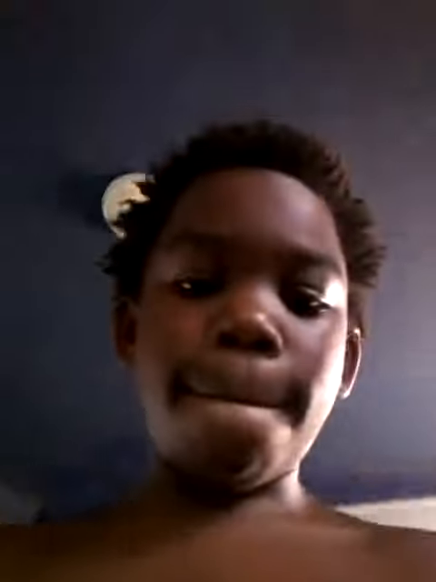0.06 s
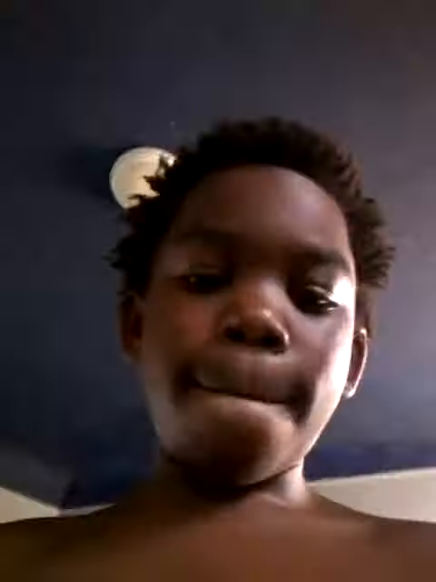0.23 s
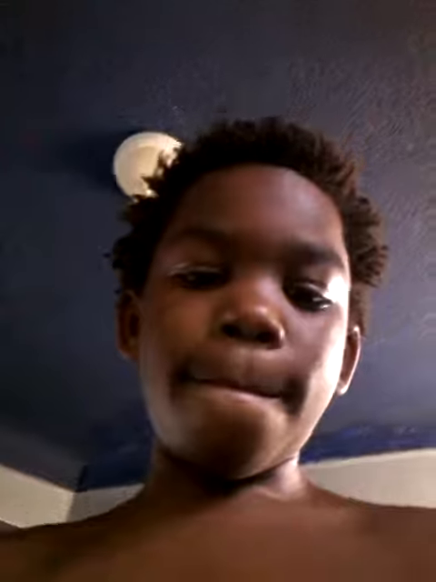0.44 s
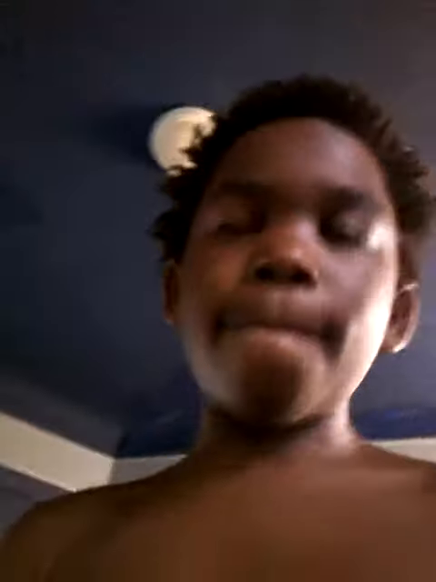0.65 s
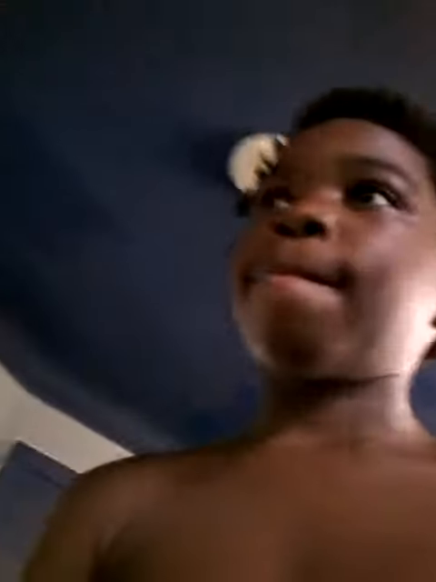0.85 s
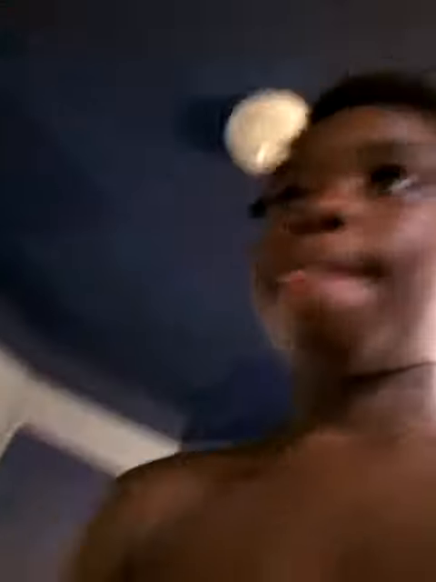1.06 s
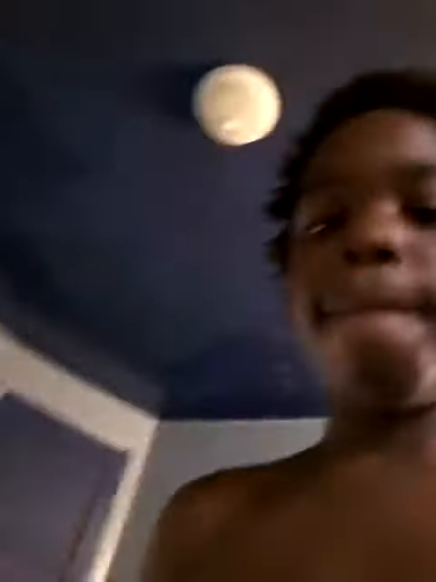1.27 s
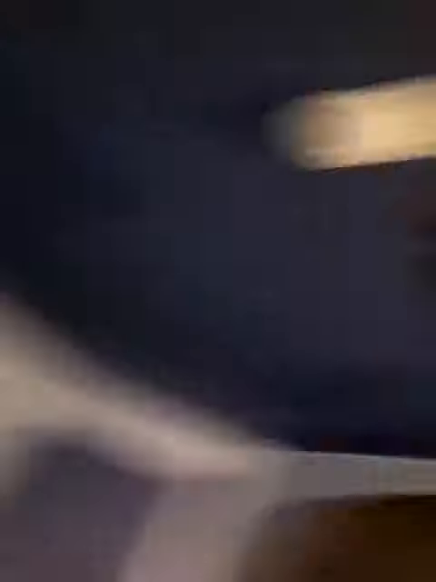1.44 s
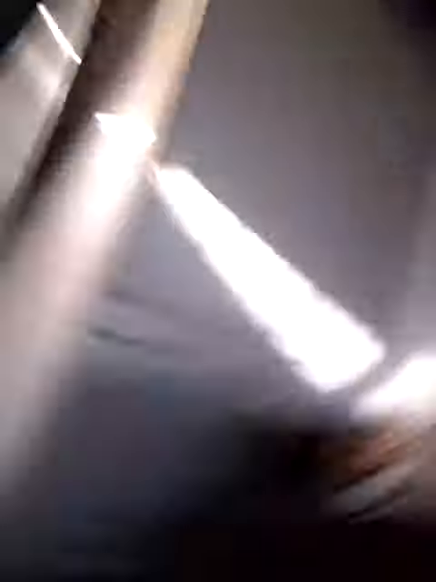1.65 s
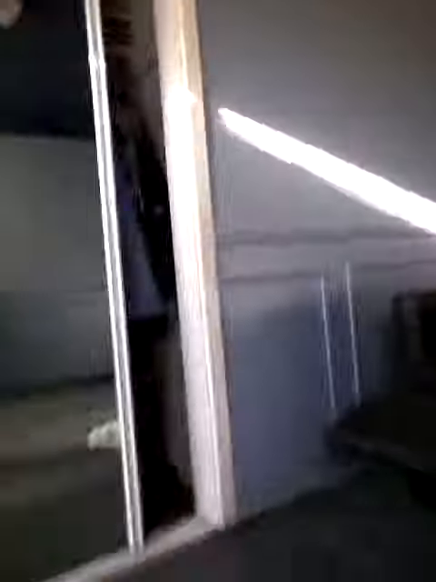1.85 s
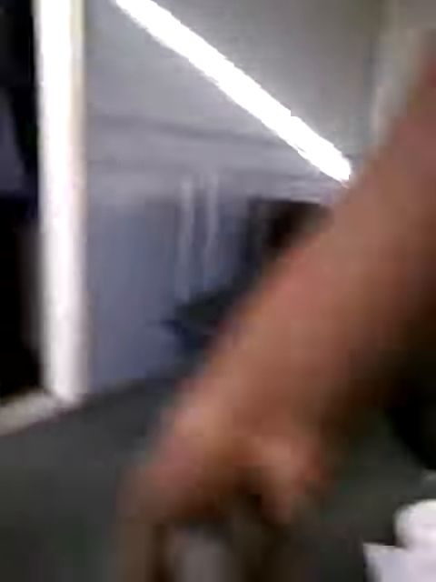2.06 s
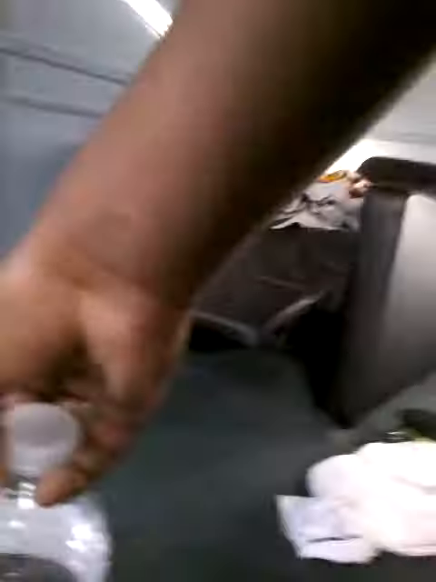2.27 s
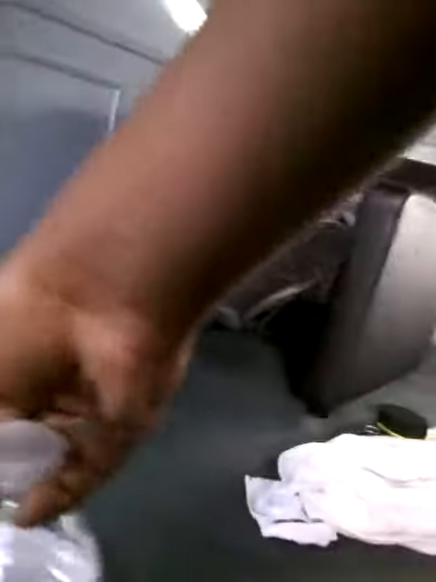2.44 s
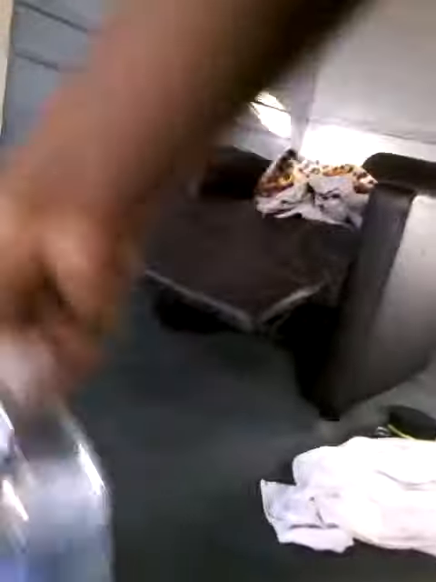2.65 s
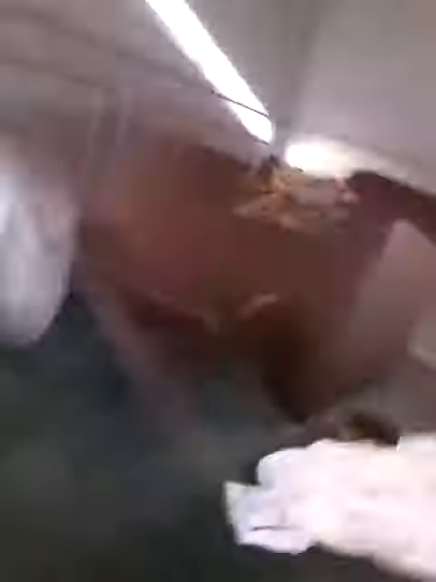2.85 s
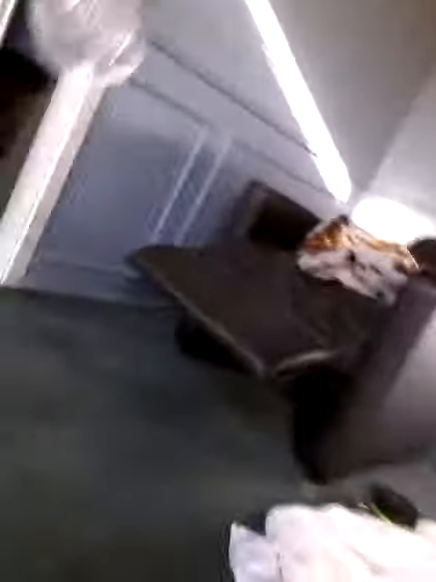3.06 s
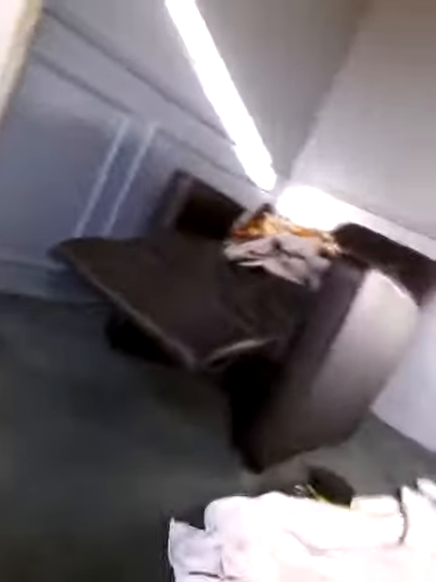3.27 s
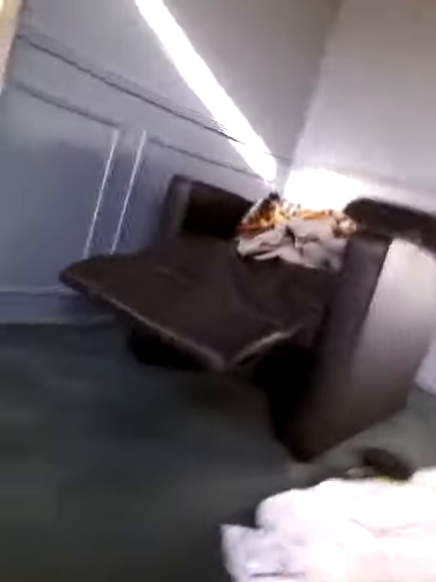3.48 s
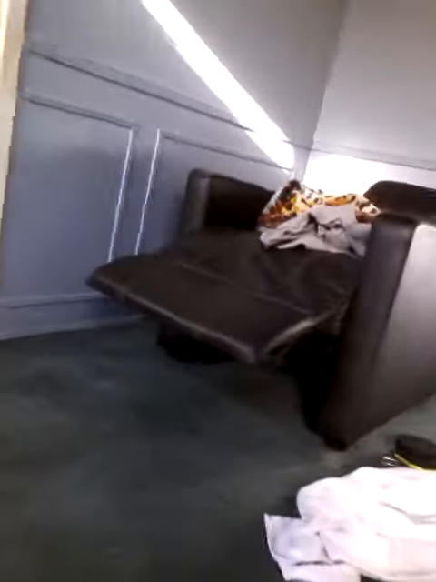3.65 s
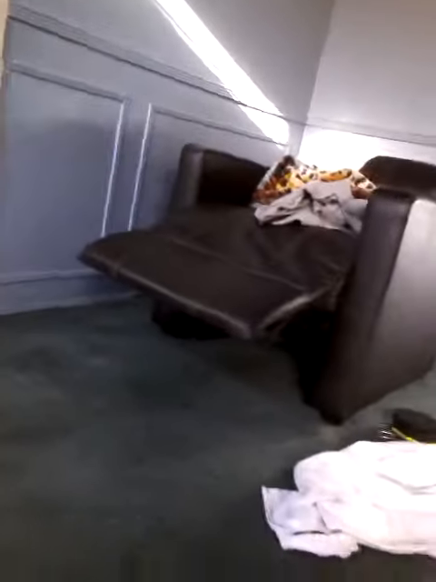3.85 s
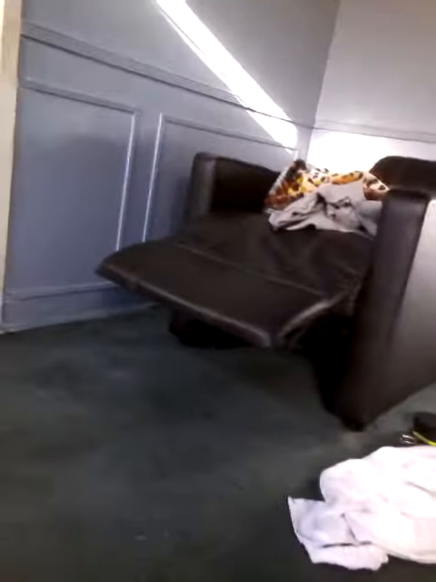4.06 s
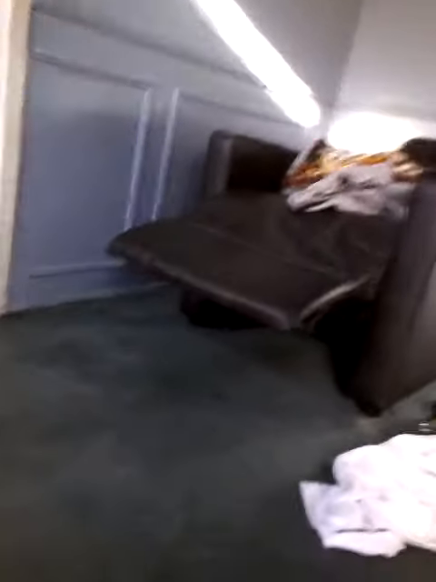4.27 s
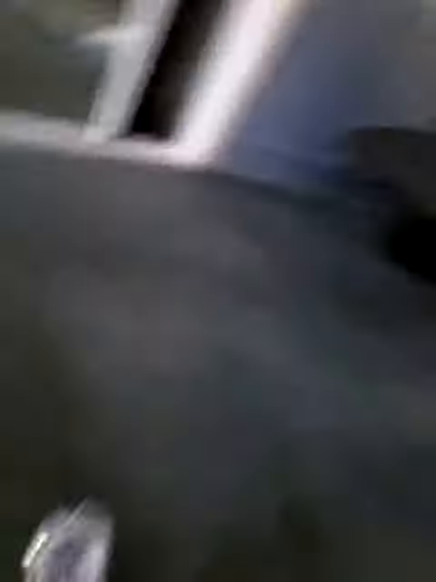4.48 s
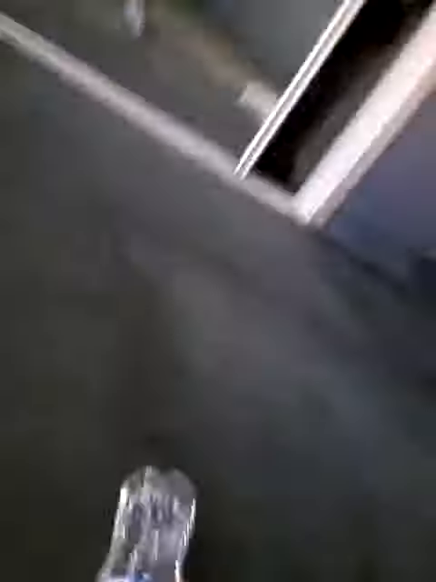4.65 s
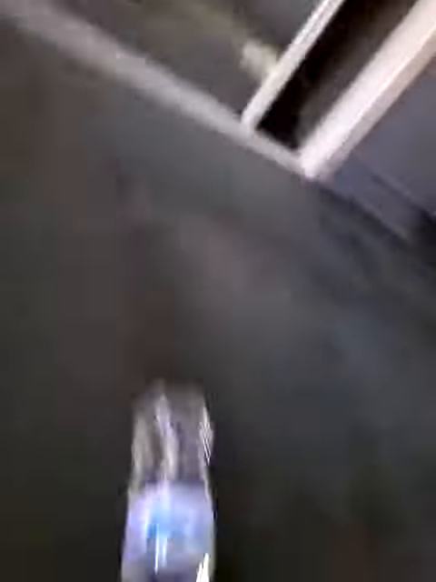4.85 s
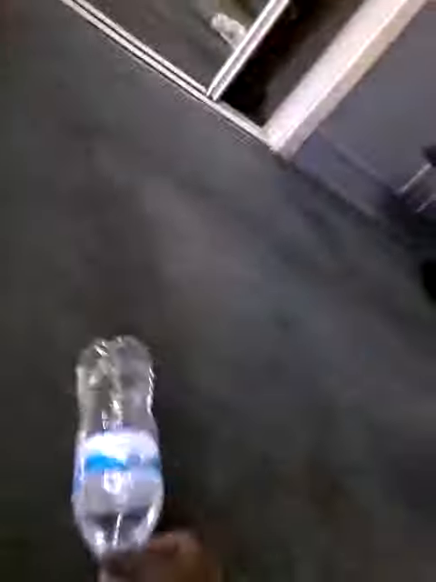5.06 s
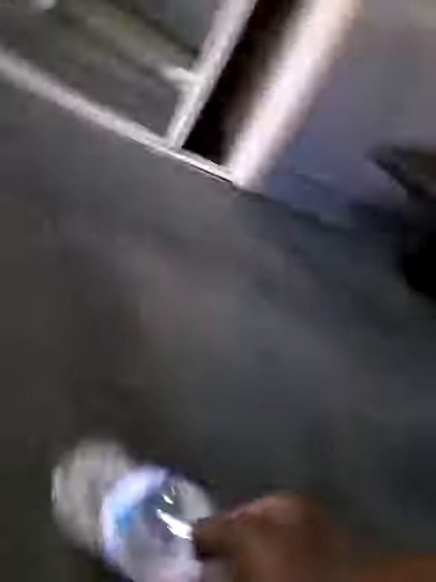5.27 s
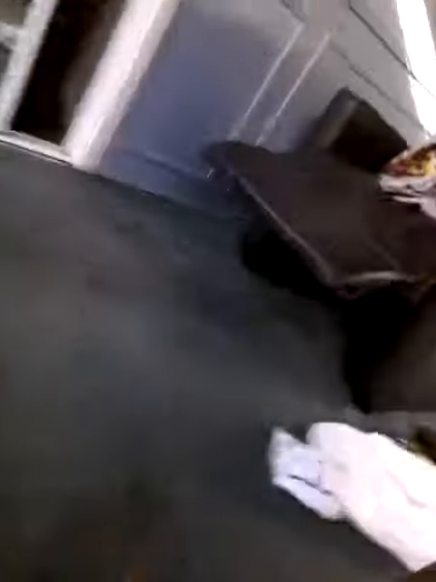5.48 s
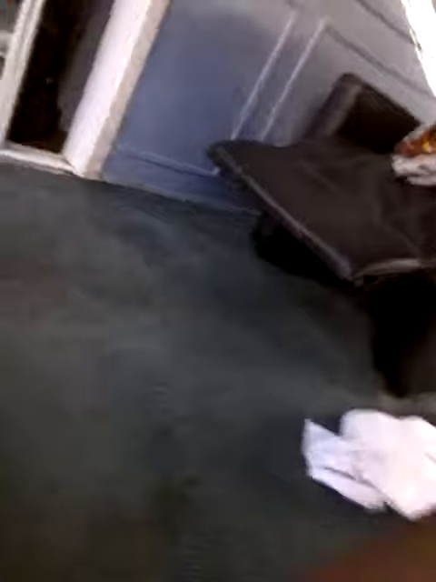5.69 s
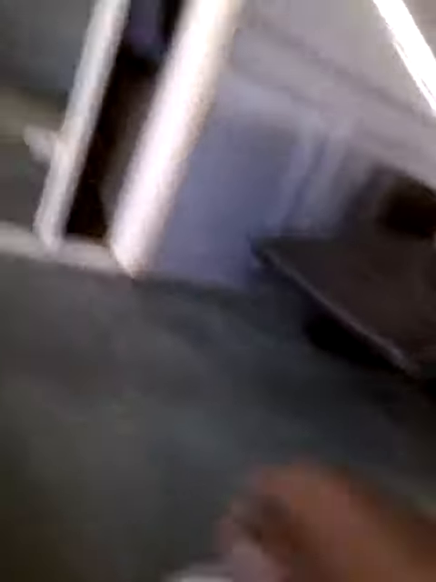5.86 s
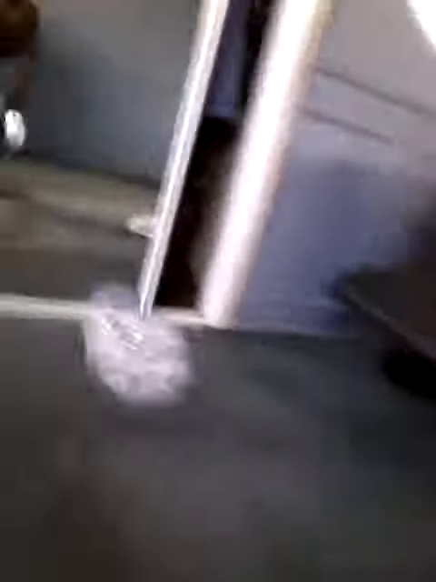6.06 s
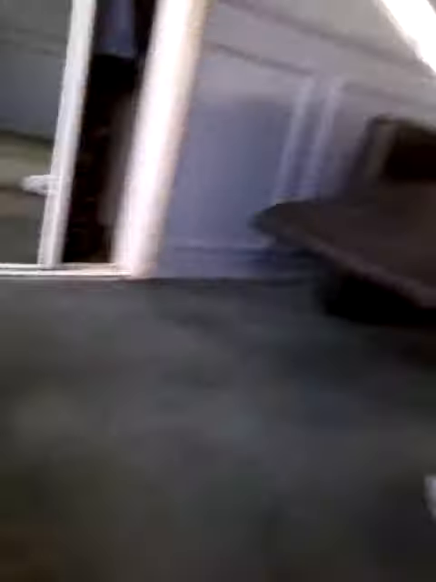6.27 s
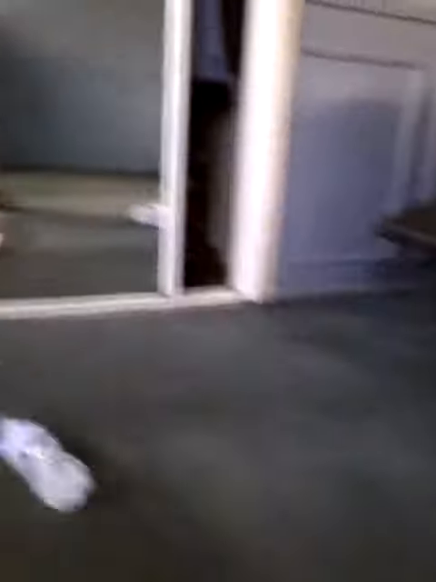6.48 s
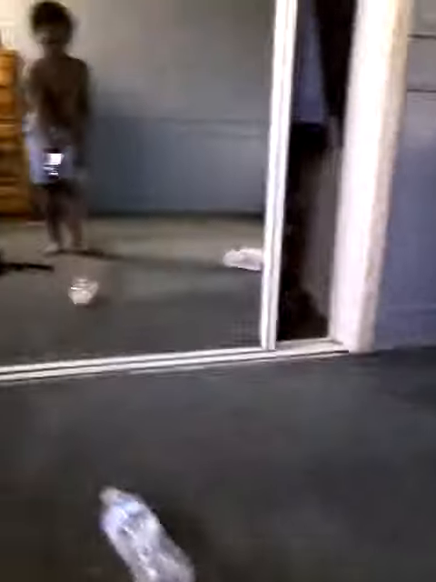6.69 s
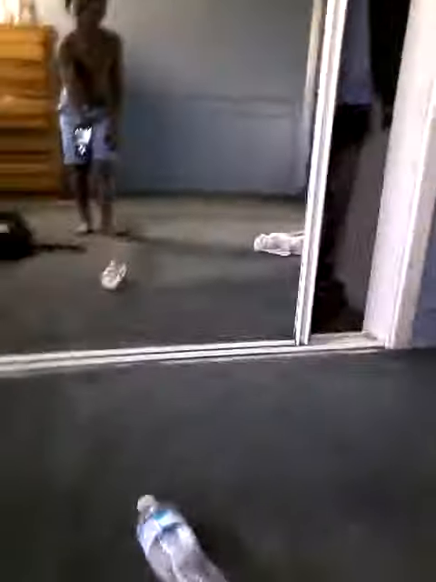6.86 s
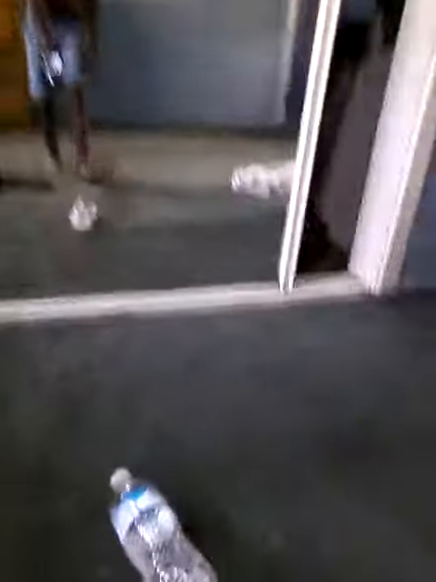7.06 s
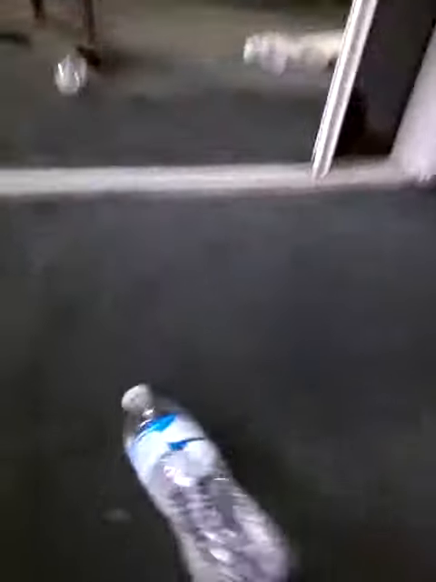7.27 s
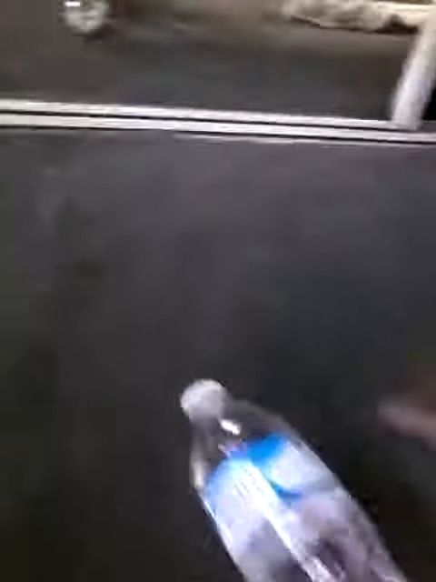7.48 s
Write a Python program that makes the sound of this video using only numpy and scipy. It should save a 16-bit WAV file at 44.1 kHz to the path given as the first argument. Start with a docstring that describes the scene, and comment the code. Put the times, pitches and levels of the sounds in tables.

```python
"""A part-filled thin plastic water bottle lands twice on a carpeted bedroom floor, handled before, between and after.
Each landing sums decaying thuds, wall knocks and floor modes with grainy noise that drives the shell's modes.
The shell snaps and pops in the hand: resonated noise cracks, hollow decaying tones, then tiny creaking ticks.
Band-passed grains scuff, coloured noise rustles as cloth, low decaying tones are footfalls and bumps, a hard
click rings, and the room holds a wavering hum, low rumble and steady air."""
import sys
import numpy as np
from scipy import signal
from scipy.fft import rfft, irfft, next_fast_len
from scipy.io import wavfile
from scipy.ndimage import map_coordinates

SR = 44100
rng = np.random.default_rng(int(sys.argv[2]) if len(sys.argv) > 2 else 0)


def dump(signal):
    """Clip the signal to [-1, 1] and save it as 16-bit WAV at the path in sys.argv[1]."""
    limited = np.clip(np.atleast_2d(signal).T, -1, 1)
    pcm = np.round(limited * 32767).astype(np.int16)
    wavfile.write(sys.argv[1], SR, pcm)


N = 332028

# Contacts of bottle and floor. Each row: start in seconds, thud level in dB, thud pitch in Hz,
# knock level in dB, knock pitch in Hz, crumple level in dB, crumple t60 in seconds.
BASE_CONTACTS = [(3.3965, -18, 198, -27, 1100, -27, 0.08), (3.4025, -32, 248, -20, 1100, -12, 0.029),
                 (3.4045, -7.5, 305, -18, 560, -21.5, 0.038), (3.4080, -25, 435, -22, 1150, -11, 0.03),
                 (3.4137, -18, 348, -13, 596, -27, 0.037), (3.4182, -35, 418, -22, 880, -20.5, 0.077),
                 (3.4345, -25, 323, -33, 576, -32.5, 0.16), (3.4575, -33, 162, -35, 420, -36, .1)]
SIDE_CONTACTS = [(6.3200, -15.5, 243, -50, 500, -46, 0.03), (6.3225, -29.5, 137, -30, 810, -24.5, 0.057),
                 (6.3272, -15, 251, -19, 1084, -17, 0.027), (6.3335, -22, 151, -39, 890, -29, 0.093),
                 (6.3475, -27, 345, -38, 560, -35.5, 0.27)]
# Spectrum of the crumpling shell, landing on its base and on its side.
# Each row: frequency in Hz, relative density in dB per Hz.
BASE_CRUMPLE_SPECTRUM = [(180, -17.5), (300, -10), (470, -2.5), (555, -9), (1030, -8), (1120, -8),
                         (1510, -15.5), (1640, -13.5), (1870, -14.5), (2900, -12.5), (3450, -8),
                         (4000, -11), (5610, -14.5), (8790, -25.5), (11900, -26.5), (16000, -33)]
SIDE_CRUMPLE_SPECTRUM = [(240, -27), (400, -4.5), (598, -8.5), (753, -6.5), (994, -13), (1150, -11),
                         (1510, -15.5), (1790, -5), (2020, -10.5), (2430, -5.5), (2800, -10), (5870, -12.5),
                         (8630, -20), (12300, -25), (16000, -30)]
# Modes of the floor and the water-loaded bottle. Each row: frequency in Hz, relative level in dB, t60 in seconds.
FLOOR_MODES = [(60, -27, 0.39), (99.6, -19.5, 0.36), (138.6, -18, 0.24), (210, -9, 0.089), (260, -19, 0.35),
               (305, -31, 0.24), (345, -19, 0.13)]
# Modes of the ribbed shell. Each row: frequency in Hz, relative level in dB, t60 in seconds.
SHELL_MODES = [(603, 12, 0.2), (726, 12, 0.25), (826, 9, 0.24), (920, 0, 0.17), (1100, 9, 0.14),
               (1350, 8, 0.16), (1620, 3, 0.13), (2050, 0, .2), (2430, -2, 0.16), (2860, 12, .2),
               (2918, 2, 0.19), (3360, 11, .15), (3570, 9, 0.18), (3900, 22, 0.2)]


def landing(contacts, crumple_spectrum, floor_db, shell_db, grain_db, cushion_s):
    """Impact excitation: the loaded bottle thumps a cushioned floor and the crumpling shell drives its own modes."""
    thud, knocks, crumple = np.zeros(N), np.zeros(N), np.zeros((2, N))
    floor = from_db(floor_db) * sum(from_db(db) * ring(hz, t60) for hz, db, t60 in FLOOR_MODES)
    heaviest_db = max(thud_db for _, thud_db, *_ in contacts)
    for start, thud_db, thud_hz, knock_db, knock_hz, crumple_db, crumple_t60 in contacts:
        body = ring(thud_hz, 7 / thud_hz)
        if thud_db == heaviest_db:  # only the heaviest contact sets the floor ringing
            body = body + floor
        cushioned_onset = 1 - fade(cushion_s)
        add(thud, start, from_db(thud_db) * body * cushioned_onset)
        add(knocks, start, from_db(knock_db) * ring(knock_hz, 0.016))

        grains = rms_one(diffuse(SR // 2) * from_db(grain_db * drift(796, SR // 2)))
        crumple_envelope = fade(crumple_t60) * (1 - fade(0.011))
        add(crumple, start, from_db(crumple_db) * grains * crumple_envelope)

    # neighbouring modes have opposite sign
    shell = sum((-1) ** k * from_db(db) * ring(hz, t60) for k, (hz, db, t60) in enumerate(SHELL_MODES))
    unit_shell = shell[None] / np.linalg.norm(shell)
    ringing = signal.oaconvolve(crumple, unit_shell, axes=1)[:, :N]
    plastic = knocks + colour(crumple, crumple_spectrum) + from_db(shell_db) * ringing
    return thud, plastic


# The shell buckles under the fingers. Each row: start in seconds, snap level in dB, snap pitch in Hz,
# snap t60 in seconds, pop level in dB, pop pitch in Hz, left minus right level of the snap in dB.
SNAPS = [(1.258, -43.5, 5400, .012, -45, 328, -5), (1.504, -42, 2060, 0.022, -53, 500, -7),
         (1.5095, -32, 2660, 0.017, -43, 345, -5), (1.524, -32, 3280, 0.027, -42, 520, -3),
         (1.532, -34, 3000, 0.0083, -42, 745, -4), (1.579, -37.5, 1880, 0.028, -53, 400, -1),
         (1.59, -37.5, 1310, 0.035, -51, 298, -8.5), (1.616, -41, 4500, 0.011, -55, 500, 1),
         (2.806, -34, 3900, 0.0036, -44, 388, 5), (2.839, -39, 6100, 0.013, -30.5, 484, 7),
         (2.844, -37, 2000, .016, -45, 500, 2), (2.8489, -33.5, 1920, 0.013, -33, 442, 11),
         (2.86, -28.5, 3740, 0.013, -21.5, 580, 6), (2.8702, -39, 2480, 0.016, -30, 593, 9),
         (2.8745, -39, 2000, .01, -44, 636, 5), (2.989, -30, 4300, 0.0088, -45, 345, 4),
         (3.003, -37.5, 4560, .007, -45, 409, 14), (3.0633, -37, 3840, 0.011, -52, 249, 1),
         (3.072, -41, 3730, 0.017, -60, 400, 4), (3.1438, -40.5, 7640, 0.019, -50, 336, 3),
         (3.1704, -53, 2220, .009, -47, 800, 4), (3.3107, -47, 1200, 0.01, -44.5, 640, 8),
         (3.621, -39, 6800, .008, -57, 780, -1), (3.629, -38.5, 3480, 0.035, -48, 700, -7),
         (3.6657, -34.5, 3250, 0.007, -48, 794, -3), (3.736, -44.5, 7800, .008, -50, 600, 4),
         (5.207, -41.5, 2660, 0.0081, -70, 500, 5), (5.224, -54, 3610, 0.0061, -58, 497, -1),
         (5.2313, -42.5, 990, .05, -43, 500, -3), (5.348, -37.5, 7500, 0.0087, -37, 860, -8),
         (5.3687, -28.5, 2010, 0.025, -30, 726, -5), (5.375, -38.5, 2090, 0.018, -35, 900, -4),
         (5.682, -41.5, 3120, 0.013, -58, 447, -5), (5.879, -39.5, 4370, 0.014, -50, 845, -3),
         (5.893, -29, 4360, 0.018, -41, 626, -1), (5.8986, -31.5, 3920, 0.044, -26.5, 560, -4),
         (5.9149, -24, 3900, 0.016, -20.5, 390, 2), (5.9715, -23, 2480, 0.0047, -29.5, 290, -12),
         (5.9769, -42, 7000, 0.0064, -32, 310, -6), (5.983, -22.5, 1780, 0.0087, -28.5, 290, -9.5),
         (6.001, -31, 1290, 0.0086, -42, 350, -4), (6.0187, -44, 1100, .012, -51, 300, -3),
         (6.0503, -28, 3750, 0.019, -64, 355, 0.5), (6.1067, -40, 2220, .009, -42, 457, 3),
         (6.137, -39, 3300, .012, -54, 475, 1), (6.694, -44, 1700, 0.018, -40, 824, 2),
         (6.701, -57, 1100, .015, -41, 627, 0)]
# Spectrum that shapes all cracks. Each row: frequency in Hz, relative density in dB per Hz.
SNAP_SPECTRUM = [(500, 7), (1200, 2.5), (2200, -1), (4000, -3), (6500, -4), (9000, -7), (13000, -9.5),
                 (16000, -12)]


def snaps(broad_db, pop_peak_cycles, rib_q, edge_db):
    """Snap-through buckling: a rib flips with a crack at its pitch, and the hand-damped wall gives a hollow pop."""
    cracks, pops = np.zeros((2, N)), np.zeros((2, N))
    size = SR // 8
    t = np.arange(size) / SR
    for start, snap_db, snap_hz, t60, pop_db, pop_hz, side_db in SNAPS:
        crack = diffuse(size) * fade(t60, size)
        crack[:, 0] += from_db(edge_db)  # a one-sample edge
        rib = signal.lfilter(*signal.iirpeak(snap_hz, rib_q, fs=SR), crack)
        add(cracks, start, from_db(snap_db) * (rib + from_db(broad_db) * crack) * pan(side_db))

        bulge = t * pop_hz / pop_peak_cycles
        pop_envelope = bulge * np.exp(1 - bulge)  # peaks at 1, then dies away
        add(pops, start, from_db(pop_db) * pop_envelope * np.sin(2 * np.pi * pop_hz * t))
    return colour(cracks, SNAP_SPECTRUM), pops


def crinkles(ticks, after_s, level_db, spread_db, cycles):
    """Stress release: each snap lets neighbouring ribs creak in ticks of random pitch, weaker on average later."""
    out = np.zeros((2, N))
    size = 600
    t = np.arange(size) / SR
    for start, snap_db, *_ in SNAPS:
        for wait, pitch, weakness, side in rng.random((ticks, 4)):
            hz = 2500 * 3.4 ** pitch
            tick = fade(cycles / hz, size) * np.sin(2 * np.pi * hz * t)
            tick_db = min(snap_db, -32) + level_db - spread_db * weakness - 5 * wait
            add(out, start + wait * after_s, from_db(tick_db) * tick * pan(12 * (side - 0.5)))
    return out


# Short scuffs of skin, plastic and carpet, and sloshes. Each row: loudest moment in seconds,
# length in seconds (half the full swell), level in dB, centre in Hz, width in octaves.
SCUFFS = [(1.306, 0.096, -62.5, 1880, 1), (1.534, 0.04, -48, 696, 2.1), (1.586, 0.034, -53.5, 1500, 6.2),
          (2.008, 0.18, -61, 2150, 0.53), (2.138, 0.066, -60, 4870, 1.8), (2.846, 0.016, -45.5, 2980, 1.6),
          (2.918, 0.061, -52, 2000, 3.4), (2.9, 0.046, -54, 630, 1.3), (3.014, 0.041, -55, 4830, 2),
          (3.193, 0.041, -57, 836, 0.36), (3.649, 0.076, -52, 3280, 0.65), (3.651, 0.13, -55.5, 563, 1.2),
          (4.522, 0.052, -57, 2800, 4.5), (4.623, 0.044, -54.5, 6000, 3.0), (4.732, .06, -57.5, 4500, 3.2),
          (4.81, 0.042, -52, 4230, 0.87), (4.802, 0.1, -53, 430, 0.38), (4.83, 0.058, -62, 1100, 1.4),
          (5.349, 0.037, -53, 6740, 0.6), (5.385, 0.045, -45, 880, 1.7), (5.434, 0.037, -53.5, 1100, 0.75),
          (5.912, 0.024, -44, 3530, 1.4), (6.106, 0.099, -52, 2380, 2.3), (6.485, 0.015, -47.5, 2480, 2),
          (6.486, 0.017, -51.5, 480, 1.6), (7.28, 0.023, -49.5, 325, 1.5), (7.351, 0.037, -50, 3000, 3)]


def scuffs(grain_db, grains_per_s):
    """Stick-slip friction: band-passed noise, broken into fine grains, swells and fades."""
    out = np.zeros((2, N))
    for peak_s, length, db, hz, octaves in SCUFFS:
        size = round(2 * length * SR)
        edges = np.clip(hz * 2 ** (np.array([-0.5, 0.5]) * octaves), 20, SR / 2 - 100)
        grains = diffuse(size) * from_db(grain_db * drift(grains_per_s, size))
        band = signal.butter(2, edges, "band", fs=SR, output="sos")
        rub = rms_one(signal.sosfilt(band, grains))
        add(out, peak_s - length, from_db(db) * rub * np.hanning(size))
    return out


# Two hard knocks close by. Each row: start in seconds, level in dB.
CLICK_KNOCKS = [(1.6865, -45), (1.6882, -32)]
# What they ring with. Each row: frequency in Hz, relative level in dB, t60 in seconds.
CLICK_MODES = [(560, -15, 0.04), (757, -10.5, 0.042), (1580, -13, 0.037), (2060, -20, 0.16),
               (2130, 3.5, 0.017), (3120, -8, 0.018), (3900, -10, 0.01), (5150, -19, .012),
               (7100, -20, 0.012), (12900, -19, .015)]


def click():
    """Modal ringing: a small hard thing knocks twice, exciting short modes and a little noise."""
    out = np.zeros((2, N))
    modes = sum(from_db(db) * ring(hz, t60) for hz, db, t60 in CLICK_MODES)
    for start, db in CLICK_KNOCKS:
        noise = from_db(-16) * diffuse(SR // 2) * fade(0.025)
        add(out, start, from_db(db) * (modes + noise))
    return out


# An arm or the body moves and clothes slide. Each row: fastest moment in seconds, swell in seconds,
# fade in seconds, level in dB, brightness in dB (added to the hiss, taken from the body).
MOVES = [(0.02, 0.11, 0.27, -75.5, 9), (1.38, 0.35, 0.27, -65.5, -5.5), (1.6, 0.2, 0.3, -68.5, -14.5),
         (2.07, 0.42, 0.26, -63, -1), (2.8, 0.83, 0.13, -84.5, -29), (2.98, 0.27, 0.15, -60, -7),
         (3.35, 0.37, 0.052, -65, -5.5), (3.63, 0.14, 0.24, -64.5, 3), (4.72, 0.54, 0.43, -60, 1.5),
         (5.35, 0.45, 0.29, -57.5, -2.5), (5.65, 0.21, 0.15, -68, -5.5), (6.12, 0.4, 0.24, -60, -1.5),
         (6.5, 0.09, 0.19, -59, 0), (7.35, 0.18, 0.2, -57.5, 0)]
# Spectra of the cloth's dull body, rub and fine hiss. Each row: frequency in Hz, relative density in dB per Hz.
BODY_SPECTRUM = [(180, -44.5), (300, 6.5), (450, 2.5), (650, -1.5), (900, -8), (1500, -52)]
RUB_SPECTRUM = [(600, -6), (1100, 9.5), (2200, 5), (3600, 4.5), (6000, -25), (8500, -14.5)]
HISS_SPECTRUM = [(4500, 0.5), (7000, 1), (9500, -5.5), (13000, -3.5), (16000, -9.5)]


def rustle(body_db, rub_db, hiss_db, grain_db, flutter_db):
    """Sliding friction of cloth: three noise bands share one grain; a brighter move trades body for hiss."""
    grain = rms_one(from_db(grain_db * drift(350) + flutter_db * drift(30)))
    speeds = [swell(peak_s, rise_s, fall_s) for peak_s, rise_s, fall_s, *_ in MOVES]
    bands = [(BODY_SPECTRUM, body_db, -1), (RUB_SPECTRUM, rub_db, 0), (HISS_SPECTRUM, hiss_db, 1)]
    out = 0
    for spectrum, trim_db, lean in bands:
        level = 0
        for speed, (*_, db, bright_db) in zip(speeds, MOVES):
            level = level + speed * from_db(db + lean * bright_db)
        out = out + from_db(trim_db) * level * colour(diffuse() * grain, spectrum)
    return out


# Soft footfalls and bumps. Each row: start in seconds, level in dB, pitch in Hz, t60 in seconds.
BUMPS = [(2.78, -37, 89, 0.072), (2.895, -43.5, 95.3, 0.68), (3.173, -24.5, 92, 0.065),
         (3.222, -30, 70, 0.036), (6.323, -37, 55.4, .13), (7.284, -29.5, 52.7, 0.23),
         (7.301, -40, 56.3, .13)]


def bumps():
    """Damped low resonance: soft pushes that start without an edge."""
    out = np.zeros(N)
    for start, db, hz, t60 in BUMPS:
        add(out, start, from_db(db) * ring(hz, t60) * (1 - fade(0.015)))
    return out


# Levels of the hum and of the rumble over time, before their trims. Each row: time in seconds, level in dB.
HUM_LEVEL = [(0.1, -81), (0.65, -64.5), (2.35, -63.5), (2.75, -52.5), (3.7, -52.5), (4.52, -64),
             (4.68, -47.5), (4.85, -59), (4.95, -47), (5.05, -59), (5.18, -52.5), (5.45, -53.5),
             (5.8, -51.5), (6.28, -46), (6.55, -53.5), (6.81, -65), (7.03, -59), (7.1, -46), (7.19, -46.5),
             (7.33, -59.5), (7.41, -54.5), (7.5, -71)]
RUMBLE_LEVEL = [(0.0, -66.5), (0.52, -69.5), (2.55, -65), (2.69, -56), (2.88, -52), (4.09, -67.5),
                (4.76, -63.5), (5.2, -58.5), (6.04, -60.5), (6.5, -62.5), (6.77, -67.5), (7.5, -57)]
# Spectra of the rumble and of the steady air. Each row: frequency in Hz, relative density in dB per Hz.
RUMBLE_SPECTRUM = [(25, -15), (45, -7.5), (60, 0.5), (85, 4.5), (115, -3.5), (170, 2), (300, -40)]
AIR_SPECTRUM = [(60, -23), (120, -15), (170, -1.5), (260, -5.5), (380, -7.5), (650, -16), (1000, -17.5),
                (1600, -22.5), (2600, -22), (4200, -27), (8500, -34), (13500, -31.5), (16000, -35.5)]
HUM_HZ = 153.5


def room_tone(hum_db, rumble_db, air_db, waver_rad, flutter_db):
    """Background noise: a tone wavering in phase and level over filtered noise rumble and steady air."""
    t = np.arange(N) / SR
    sine = np.sin(2 * np.pi * HUM_HZ * t + waver_rad * drift(11))
    tone = rms_one(sine * from_db(flutter_db * drift(19)))
    hum = from_db(np.interp(t, *np.transpose(HUM_LEVEL)) + hum_db) * tone
    rumble_level = from_db(np.interp(t, *np.transpose(RUMBLE_LEVEL)) + rumble_db)
    rumble = rumble_level * colour(diffuse(), RUMBLE_SPECTRUM)
    air = from_db(air_db) * colour(diffuse(), AIR_SPECTRUM)
    return hum + rumble + air


# Reverberation time of the room. Each row: frequency in Hz, t60 in seconds.
ROOM_T60 = [(80, 0.68), (250, 0.41), (700, 0.36), (2500, 0.32), (6000, 0.28), (14000, 0.27)]


def room_response(build_s, size=SR // 2):
    """Reverberant decay: reflections build up within milliseconds and die sooner in the treble; unit energy."""
    noise, hz = rfft(diffuse(size)), np.fft.rfftfreq(size, 1 / SR)
    out = 0
    for k, (_, t60) in enumerate(ROOM_T60):
        # 1 at this band's centre, sloping to 0 at its neighbours
        share = at_hz([(centre, j == k) for j, (centre, _) in enumerate(ROOM_T60)], hz)
        out = out + irfft(noise * share, size) * fade(t60, size)
    build_up = 1 - np.exp(-(np.arange(size) / SR / build_s) ** 2)
    return rms_one(out * build_up) / np.sqrt(size)


# Likeness of the two channels in diffuse sound. Each row: frequency in Hz, correlation from -1 to 1.
LIKENESS = [(40, 1), (150, 0.91), (330, 0.88), (650, 0.55), (1300, -0.09), (3500, -0.069), (15000, 0.063)]


def diffuse(size=N):
    """Diffuse-field coherence: white stereo noise, alike in the bass and nearly unrelated in the treble."""
    padded = next_fast_len(size)
    mid, side = rfft(rng.standard_normal((2, padded)))
    alike = np.clip(at_hz(LIKENESS, np.fft.rfftfreq(padded, 1 / SR)), -1, 1)
    stereo = np.sqrt(1 + alike) * mid + np.sqrt(1 - alike) * side * [[1], [-1]]
    return irfft(stereo, padded)[:, :size]


def colour(x, spectrum, size=4096):
    """Minimum-phase filtering: a causal filter of unit power gain, found by folding the cepstrum."""
    gain = rms_one(from_db(at_hz(spectrum, np.fft.rfftfreq(size, 1 / SR))))
    cepstrum = irfft(np.log(gain))
    cepstrum[1:size // 2] *= 2
    cepstrum[size // 2 + 1:] = 0
    impulse = irfft(np.exp(rfft(cepstrum)))
    return signal.oaconvolve(x, impulse[None], axes=1)[:, :x.shape[1]]


def drift(rate, size=N):
    """Band-limited randomness: a smooth curve through unit-spread random knots, rate of them per second."""
    knots = rng.standard_normal(size // 8)
    return map_coordinates(knots, [np.arange(size) * rate / SR], order=2, mode="wrap")


def swell(peak_s, rise_s, fall_s):
    """Raised-cosine envelope: a smooth rise to 1 at the peak and a smooth fall."""
    t = np.arange(N) / SR - peak_s
    return np.cos(np.pi / 2 * np.clip(t / np.where(t < 0, rise_s, fall_s), -1, 1)) ** 2


def fade(t60, size=SR // 2):
    """Exponential decay: 60 dB down after t60 seconds."""
    return np.exp(-np.log(1000) * np.arange(size) / SR / t60)


def ring(hz, t60):
    """Damped oscillation: a struck mode whose envelope starts at 1."""
    return fade(t60) * np.sin(2 * np.pi * hz * np.arange(SR // 2) / SR)


def from_db(db):
    """Decibel law: level to amplitude."""
    return 10 ** (np.asarray(db) / 20)


def rms_one(x):
    """Power normalization: scales to a root mean square of 1."""
    return x / np.sqrt(np.mean(x ** 2) + 1e-20)


def at_hz(points, hz):
    """Logarithmic pitch scale: reads a table on a log-frequency axis."""
    f, value = np.transpose(points)
    return np.interp(np.log(np.maximum(hz, 1)), np.log(f), value)


def pan(db):
    """Interchannel level difference: left minus right in dB, split evenly."""
    return from_db(np.array([[db], [-db]]) / 2)


def add(out, start, sound):
    """Superposition: mixes a sound in from the start time in seconds."""
    at = round(start * SR)
    out[..., at:at + sound.shape[-1]] += sound[..., :N - at]


def scene():
    """Direct and reverberant fields: impacts and handling excite the room; cloth, bumps and room tone stay dry."""
    base_thud, base_plastic = landing(BASE_CONTACTS, BASE_CRUMPLE_SPECTRUM,
                                      floor_db=-13.0, shell_db=-31.0, grain_db=4.0, cushion_s=0.0056)
    side_thud, side_plastic = landing(SIDE_CONTACTS, SIDE_CRUMPLE_SPECTRUM,
                                      floor_db=4.0, shell_db=-29, grain_db=3.0, cushion_s=0.0032)
    thuds = base_thud + side_thud
    plastic = base_plastic * pan(-0.26) + side_plastic * pan(0.81)

    cracks, pops = snaps(broad_db=-10.0, pop_peak_cycles=0.48, rib_q=4.4, edge_db=13)
    creaks = crinkles(ticks=10, after_s=0.06, level_db=-10.5, spread_db=28, cycles=33)
    handling = cracks + creaks + scuffs(grain_db=5.5, grains_per_s=450)
    tick = click() * pan(-8.0)

    # each source with its send to the room in dB
    sources = [(thuds, -7), (plastic, -5), (handling, -5.5), (pops, -7.0), (tick, -10.5)]
    direct = sum(sound for sound, _ in sources)
    sent = sum(sound * from_db(room_db) for sound, room_db in sources)
    echo = signal.oaconvolve(sent, room_response(build_s=0.00098), axes=1)[:, :N]

    cloth = rustle(body_db=-3.5, rub_db=-1.0, hiss_db=-0.4, grain_db=1.3, flutter_db=1.3)
    background = room_tone(hum_db=-0.5, rumble_db=1.5, air_db=-61.0, waver_rad=1.3, flutter_db=4.5)
    return direct + echo + cloth + bumps() + background


# Balance of the microphone's two sides. Each row: frequency in Hz, left minus right level in dB.
PORT_BALANCE = [(100, -2), (500, -0.9), (1000, -1.4), (2000, -0.5), (4000, -0.5), (8000, -2), (13000, -2)]
PORT_LAG_S = 0.00015  # sound reaches the left side later than the right
CUTOFF_HZ = 16100


def record(dry):
    """Transducer response: a small microphone with two unlike sides loses the deepest bass and the top."""
    size = next_fast_len(N + SR // 8)
    hz = np.fft.rfftfreq(size, 1 / SR)
    # half the difference goes to each side, with opposite sign
    lean = from_db(at_hz(PORT_BALANCE, hz) / 2) * np.exp(-1j * np.pi * hz * PORT_LAG_S)
    ports = irfft(rfft(dry, size) * np.array([lean, 1 / lean]), size)[:, :N]
    bass_cut = signal.butter(5, 43, "high", fs=SR, output="sos")
    top_cut = signal.ellip(10, 0.2, 70, CUTOFF_HZ, fs=SR, output="sos")
    return signal.sosfilt(top_cut, signal.sosfilt(bass_cut, ports))


dry = scene()
out = record(dry)
dump(out)
```